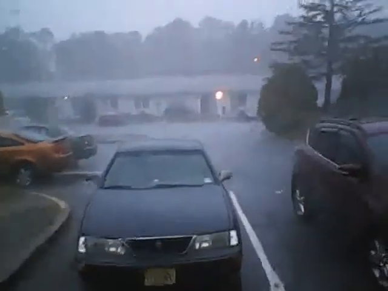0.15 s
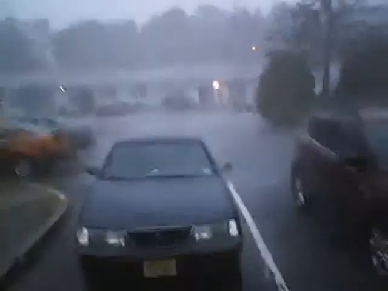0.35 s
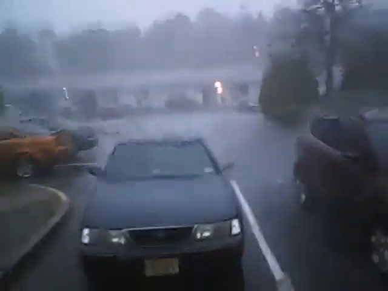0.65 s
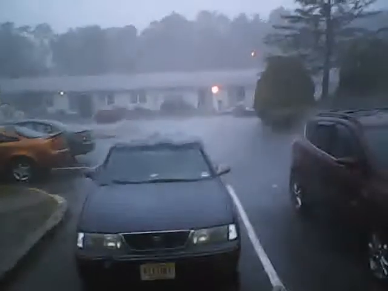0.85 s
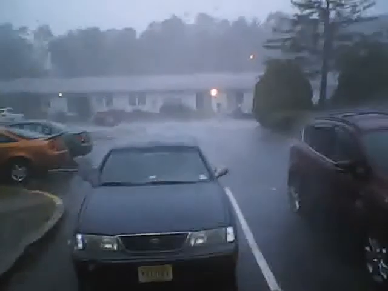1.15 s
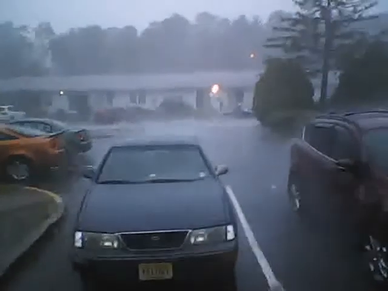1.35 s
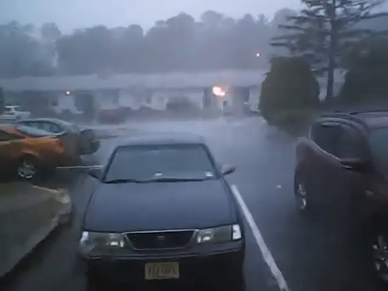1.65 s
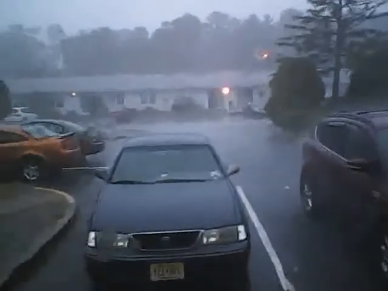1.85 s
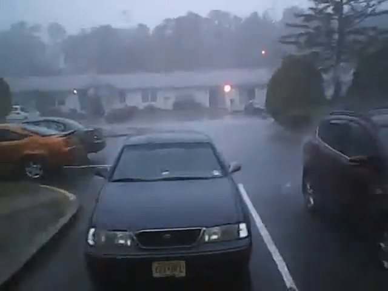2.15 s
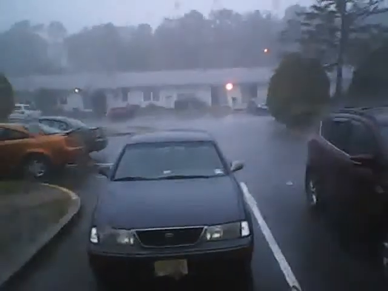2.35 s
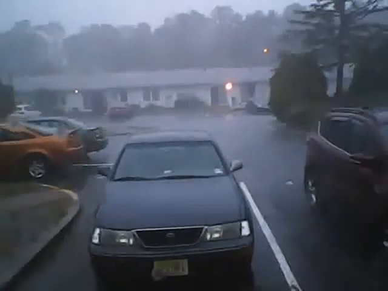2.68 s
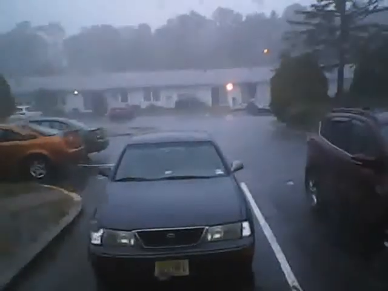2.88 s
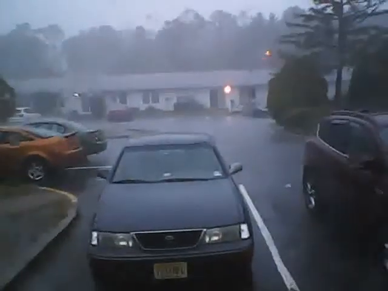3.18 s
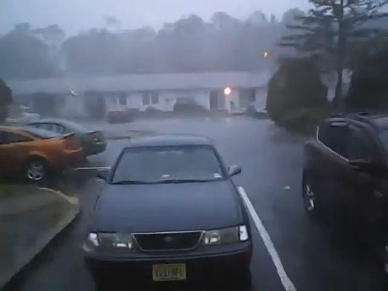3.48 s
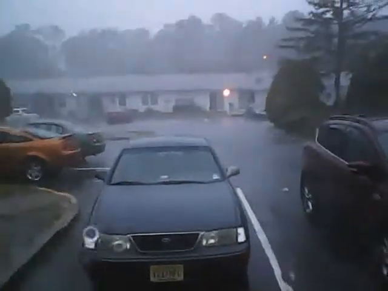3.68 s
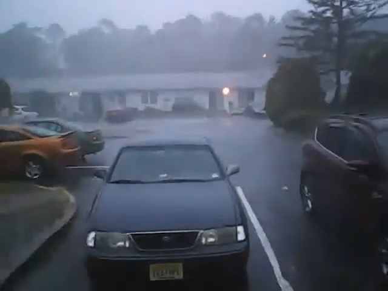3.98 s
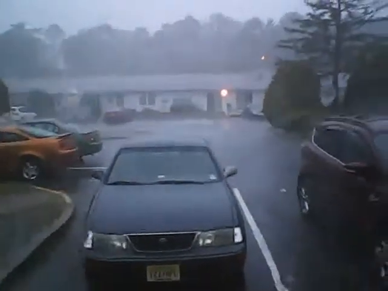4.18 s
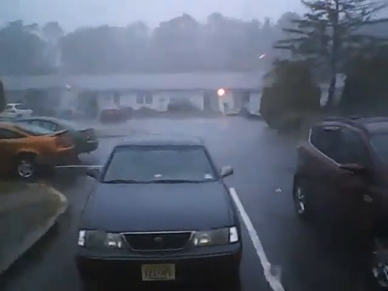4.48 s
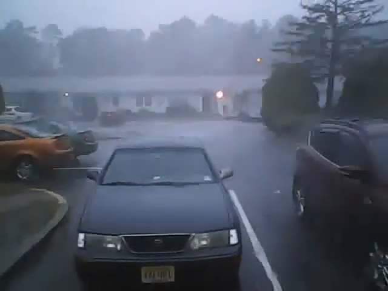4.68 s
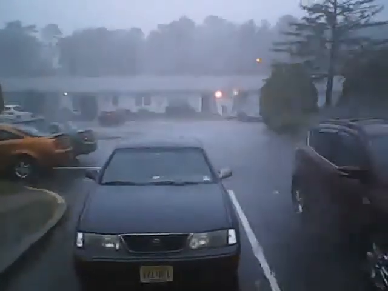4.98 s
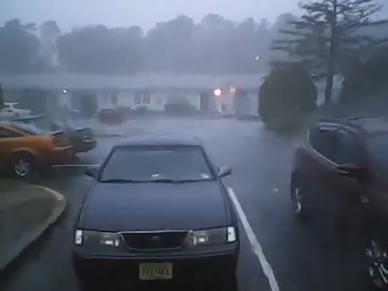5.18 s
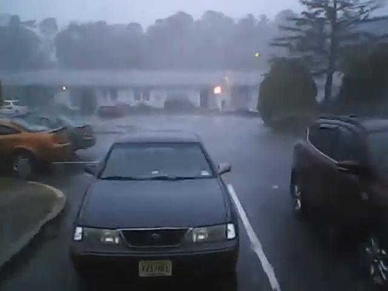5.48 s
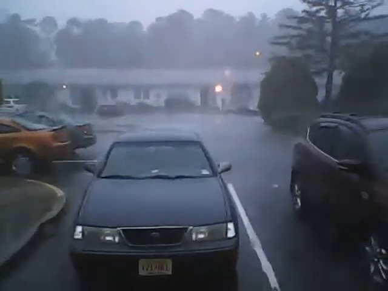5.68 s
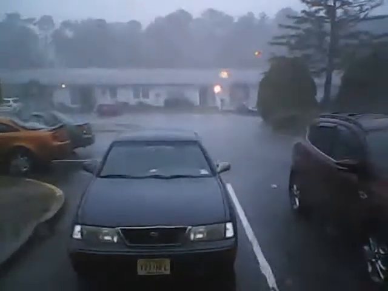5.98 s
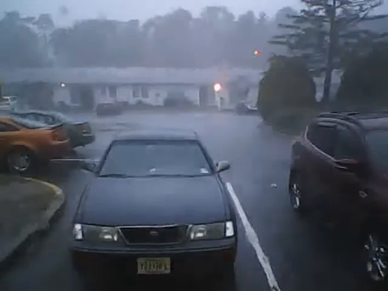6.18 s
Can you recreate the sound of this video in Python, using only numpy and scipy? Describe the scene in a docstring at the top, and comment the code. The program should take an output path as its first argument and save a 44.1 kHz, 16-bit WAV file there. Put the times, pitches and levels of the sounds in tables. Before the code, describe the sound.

A steady downpour hisses and sizzles on wet asphalt and drums faintly on parked cars, with low rumbling wind. Two quick clusters of close plastic handling clicks and a soft rustle come at the start, followed by two single drip ticks on the sheltered microphone. The rain grows a little louder in gusts through the middle and near the end, with a very faint high electronic whine behind it.

```python
"""A wash of heavy rain on a car park, heard from shelter through a small hand-held camera.
Countless far drops merge into a hiss that swells with the squalls; nearer drops patter, spray sizzles,
roofs roar, parked cars drum and the air rumbles. The camera's case colours the hiss and clicks in the
hand early on; two stray drops tick on the microphone's cover, and the electronics add a thin whine."""
import sys
import numpy as np
from scipy import signal
from scipy.fft import rfft, irfft
from scipy.io import wavfile
from scipy.ndimage import uniform_filter1d

SR = 44100
rng = np.random.default_rng(int(sys.argv[2]) if len(sys.argv) > 2 else 0)


def master_out(mix):
    """Clip the mix to full scale and print it as 16-bit PCM to the path in sys.argv[1]."""
    frames = np.transpose(np.atleast_2d(mix))
    ceiling = np.clip(frames, -1, 1)
    pcm = np.round(ceiling * 32767).astype(np.int16)
    wavfile.write(sys.argv[1], SR, pcm)


N = 279153
TIME = np.arange(N) / SR
BINS = np.fft.rfftfreq(N, 1 / SR)


def gain_of(db):
    """Decibels to amplitude."""
    return 10 ** (np.asarray(db) / 20)


def unit_rms(x):
    """Scales to rms 1."""
    return x / np.sqrt(np.mean(x ** 2) + 1e-20)


def eq_curve(points):
    """Gain in dB at every bin, joining the points on a log-frequency axis."""
    hz, db = np.transpose(points)
    return np.interp(np.log(BINS + 1), np.log(hz + 1), db)


def bell(hz, width_hz):
    """Power response of one resonance."""
    return 1 / (1 + (2 * (BINS - hz) / width_hz) ** 2)


def coloured(x, db):
    """Filters by a gain in dB per bin; rms 1."""
    return unit_rms(irfft(rfft(x) * gain_of(db), N))


def band_passed(x, hz, width_hz):
    """Filters through one steep-sided resonance; rms 1."""
    return coloured(x, 20 * np.log10(bell(hz, width_hz)))


def low_passed(x, hz, taps):
    """A steep low-pass."""
    kernel = signal.firwin(taps, hz, window=("kaiser", 9), fs=SR)
    return signal.oaconvolve(x, kernel[None], "same")


def hump(s, half_s):
    """A smooth rise and fall of height 1 around time s."""
    return np.exp(-((TIME - s) / half_s) ** 2)


def add(mix, s, sound):
    """Mixes a sound in at time s."""
    part = mix[round(s * SR):][:len(sound)]
    part += sound[:len(part)]


def patchy_noise(patchy_db):
    """Noise whose level drifts in patches about 60 ms long and 500 Hz wide."""
    spectrogram = signal.stft(rng.standard_normal(N), nperseg=512)[2]
    patches = uniform_filter1d(rng.standard_normal(spectrogram.shape), size=6, axis=0)
    patches = unit_rms(uniform_filter1d(patches, size=10, axis=1))
    return unit_rms(signal.istft(spectrogram * gain_of(patchy_db * patches))[1][:N])


def drops(per_s, spread_db, cycles, pitches=28):
    """Splashes on wet asphalt: damped grains of many pitches; a positive spread makes a few stand out."""
    t, out = np.arange(256) / SR, np.zeros(N)
    size_db = spread_db * np.minimum(rng.exponential(1, N), 5)
    polarity = rng.choice([-1, 1], N)
    hits = gain_of(size_db) * polarity * (rng.random(N) < per_s / SR)
    pitch = rng.integers(0, pitches, N)
    for k, hz in enumerate(np.geomspace(700, 9500, pitches)):
        grain = hz * np.sin(2 * np.pi * hz * t) * np.exp(-hz * t / cycles)
        out += signal.oaconvolve(hits * (pitch == k), grain)[:N]
    return unit_rms(out)


def downpour(layer="hiss", steady_db=-1.79):
    """Level ride of the rain's hiss or roar in dB: a steady level with squalls on top."""
    # squalls sweeping over the car park: crest t/s, half length/s, hiss lift/dB, roar lift/dB
    squalls = [(1.75, 0.39, .5, 4), (4.142, 0.87, 2.5, 3.5), (5.35, 0.85, 1.5, 0.7), (6.15, 0.65, 3.5, 5)]
    return steady_db + sum((roar_db if layer == "roar" else hiss_db) * hump(s, half_s)
                           for s, half_s, hiss_db, roar_db in squalls)


def rain():
    """Far wash and near patter swell together and pass the resonances of the case."""
    # spectrum of the rain's hiss: f/Hz, level/dB
    hiss_eq = [(200, -51), (600, 4), (950, -1), (1300, -4), (1550, -7), (2500, -4.5), (3400, -9),
               (3900, -5.5), (4250, -10), (5600, -9), (7000, -18), (7500, -12), (9200, -15), (10200, -16)]
    # air resonances of the case around the microphone: f/Hz, width/Hz, lift/dB
    cavities = [(970, 190, 1.5), (1329, 165, 6), (2006, 450, 8), (2977, 550, 7.5), (3683, 380, 6.5),
                (4840, 63, 8), (6210, 100, 8.5), (6900, 350, 11.5), (7650, 350, -5), (8760, 670, 4.5)]
    colour_db = eq_curve(hiss_eq) + sum(lift_db * bell(hz, width) for hz, width, lift_db in cavities)
    wash = gain_of(-47.5) * coloured(patchy_noise(patchy_db=0.75), colour_db)
    patter = gain_of(-58.5) * coloured(drops(per_s=1500, spread_db=3.5, cycles=1.45), colour_db)
    return (wash + patter) * gain_of(downpour())


def sizzle(swell=0.73, turn_s=1.65, ease_s=0.3):
    """Fine spray off the flooded asphalt follows the rain; it crossfades from thin to fuller early on."""
    spray = drops(per_s=5000, spread_db=-2.0, cycles=1.1)
    thin = gain_of(-66) * band_passed(spray, hz=9000, width_hz=1000)
    full = gain_of(-62) * band_passed(spray, hz=6600, width_hz=1000)
    crossfade = 0.5 + 0.5 * np.tanh((TIME - turn_s) / ease_s)
    return ((1 - crossfade) * thin + crossfade * full) * gain_of(swell * downpour())


def roar():
    """The duller sound of rain on roofs and trees surges more than the hiss."""
    # spectrum of the roar: f/Hz, level/dB
    roar_eq = [(120, -11), (280, -2.5), (370, 3.5), (460, 0), (560, -1), (720, -6), (880, 0.5), (1250, -5),
               (1600, -34.5), (4000, -20)]
    return gain_of(-50 + downpour("roar")) * coloured(patchy_noise(patchy_db=0.7), eq_curve(roar_eq))


def car_panels(swell=0.87):
    """Dense drops keep low modes of the car bodies ringing."""
    # modes of the car bodies: f/Hz, width/Hz, level before the swell/dB
    modes = [(206.4, 12, -58.5), (234, 13, -54.5), (563, 43, -61)]
    ring = sum(gain_of(db) * band_passed(rng.standard_normal(N), hz, width) for hz, width, db in modes)
    return gain_of(swell * downpour()) * ring


def wind(swell=0.43):
    """The air rumbles harder with each squall."""
    # spectrum of the rumbling air: f/Hz, level/dB
    rumble_eq = [(6, -10), (17, 5.5), (35, 1), (55, -1), (66, -4.5), (125, -7), (170, -10.5), (260, -13),
                 (500, -28.5), (1500, -59)]
    return gain_of(-40 + swell * downpour()) * coloured(rng.standard_normal(N), eq_curve(rumble_eq))


def rustle(level_db=-56, fade_s=2.35):
    """A soft rustle, perhaps the grip settling on the case, fades away at the start."""
    grains = drops(per_s=3000, spread_db=2.2, cycles=1.4)
    return gain_of(level_db) * hump(0, fade_s) * band_passed(grains, hz=1780, width_hz=750)


def whine(throb_hz=17, depth=0.54):
    """Thin tones from the camera's electronics, throbbing quickly."""
    # tones of the electronics: f/Hz, rms level before the throb/dB
    partials = [(9599, -86), (10098, -69.5)]
    tones = sum(gain_of(db) * np.sqrt(2) * np.sin(2 * np.pi * hz * TIME) for hz, db in partials)
    return tones * (1 + depth * np.sin(2 * np.pi * throb_hz * TIME))


def snap(t, rattle=0.06, rattle_s=0.0022):
    """The force of one contact: an impulse with a short rattle."""
    return (t == 0) + rattle * rng.standard_normal(len(t)) * np.exp(-t / rattle_s)


def shell_ring(force, peak_db, centre_hz, octaves, rise_s=0.00028):
    """Each contact rings the shell's modes around its own centre pitch, sounding duller or brighter."""
    # modes of the camera's plastic shell: f/Hz, level/dB, t60/s
    modes = [(830, -10, 0.0054), (1030, -2, 0.022), (1276, 3, 0.012), (1670, 8.5, .005), (2000, 5, 0.0092),
             (2580, -2.5, 0.0079), (3140, -0.5, 0.012), (3874, -2, 0.011), (4270, 1, 0.0065),
             (4830, -2, .0067), (6180, -1.5, .0068), (7000, 3, .0066), (7880, 2, 0.0072), (8230, 0, 0.0064),
             (9080, 4.5, 0.0048)]
    t, ring = np.arange(len(force)) / SR, np.zeros(len(force))
    for hz, db, t60 in modes:
        weight = np.exp(-0.5 * (np.log2(hz / centre_hz) / octaves) ** 2)
        ring += weight * gain_of(db - 60 * t / t60) * np.sin(2 * np.pi * hz * t)
    sound = signal.fftconvolve(force, ring * (1 - np.exp(-t / rise_s)))[:len(t)]
    low_cut = signal.butter(3, 670, "high", fs=SR, output="sos")  # so small a shell radiates no bass
    sound = signal.sosfilt(low_cut, sound)
    return gain_of(peak_db) * sound / abs(sound).max()


def handling():
    """The case clicks in the hand and rasps where the hand slides."""
    # clicks of the case: t/s, peak level/dB, centre f/Hz, spread/octaves, rise/s
    clicks = [(.129, -34, 1500, 0.67, 0.00057), (.2512, -12, 1600, 0.74, 0.00013),
              (.259, -36, 7400, 0.54, .0008), (0.2596, -32, 1000, 0.15, .0006),
              (0.261, -23.5, 6000, 1.7, .0005), (.2897, -20.5, 4800, 1.9, 0.00028),
              (0.3237, -25.5, 3700, 0.73, .003), (.3542, -32.5, 3000, 0.6, .003),
              (.393, -41, 2000, 1, .0005), (.642, -30, 1800, 0.68, .0005),
              (0.6498, -36.5, 850, 0.27, .0005), (.6556, -22.5, 8300, 0.7, 0.00039),
              (.667, -28, 1400, 1.8, .0002), (0.667, -23, 3300, 0.47, 0.0012)]
    # rubs of the hand: t/s, length/s, peak level/dB, centre f/Hz, spread/octaves
    rubs = [(0.286, 0.03, -33, 6000, 1.5), (0.641, 0.017, -30.5, 6500, 1.7)]
    t, out = np.arange(3000) / SR, np.zeros(N)
    for s, *contact in clicks:
        add(out, s, shell_ring(snap(t), *contact))
    for s, length_s, *contact in rubs:
        rasp = rng.standard_normal(len(t)) * np.sqrt(np.maximum(1 - t / length_s, 0))
        add(out, s, shell_ring(rasp, *contact))
    return out


def brief_swells():
    """Low wind buffets, two short rises of the car panels' hum and one mid-pitched rush."""
    # swells of band noise: crest t/s, half length/s, level/dB, centre f/Hz, width/Hz
    swells = [(0.25, 0.12, -47.5, 114, 60), (0.72, 0.06, -39.5, 48, 32), (1.3, 0.05, -42, 56, 36),
              (3.213, 0.063, -45, 236, 30), (3.266, 0.069, -43, 135, 90), (4.36, 0.44, -47.5, 104, 80),
              (5.38, 0.18, -46.5, 50, 30), (5.95, 0.14, -44, 52, 25.3), (6.218, 0.14, -47.5, 720, 700),
              (6.283, 0.068, -45, 207, 40)]
    return sum(gain_of(db) * hump(s, half_s) * band_passed(rng.standard_normal(N), hz, width_hz)
               for s, half_s, db, hz, width_hz in swells)


def drips(flatten_s=0.0002):
    """Stray drops flatten and tick on the microphone's cover: a sharp hit and a brief splash."""
    # drops that hit the cover: t/s, peak level/dB
    hits = [(1.0796, -22.5), (2.0539, -24.5)]
    # modes of the cover: f/Hz, level/dB, t60/s
    modes = [(930, -5.5, 0.021), (1400, -1, .006), (1810, 2, 0.006), (3130, -1, 0.014), (3860, 1.5, 0.0065),
             (4300, -3, .004), (6000, 2, .007), (6400, -1, 0.0052), (9100, -8, .006)]
    t, out = np.arange(2000) / SR, np.zeros(N)
    ring = sum(gain_of(db - 60 * t / t60) * np.sin(2 * np.pi * hz * t) for hz, db, t60 in modes)
    attack = 1 - np.exp(-t / flatten_s)
    for s, peak_db in hits:
        tick = signal.fftconvolve(snap(t), ring * attack)[:len(t)]
        add(out, s, gain_of(peak_db) * tick / abs(tick).max())
    return out


def scene():
    """All sources at one microphone."""
    weather = rain() + sizzle() + roar() + car_panels() + wind() + brief_swells()
    return (weather + rustle() + whine() + handling() + drips())[None]


def record(dry, mirror_db=-17, dc_offset=-0.0362):
    """The camera samples at half rate, mirroring its top treble faintly upward; it rests just off zero."""
    band = low_passed(dry, hz=10300, taps=511)
    mirror = gain_of(mirror_db) * band * (-1) ** np.arange(N)  # flips the spectrum about SR / 4
    return dc_offset + low_passed(band + mirror, hz=12000, taps=255)


dry = scene()
out = record(dry)
master_out(out)
```